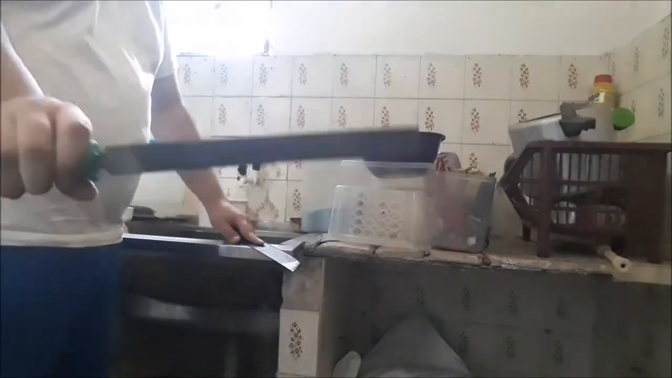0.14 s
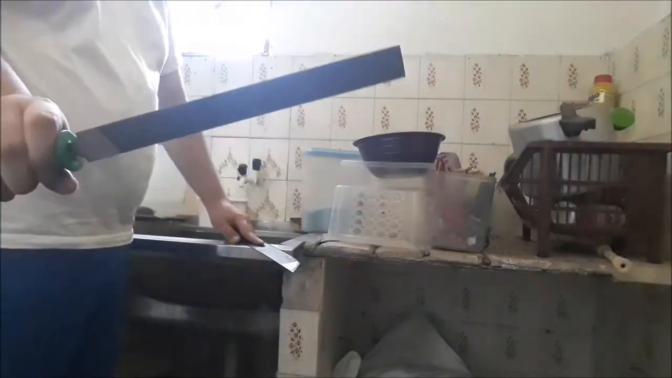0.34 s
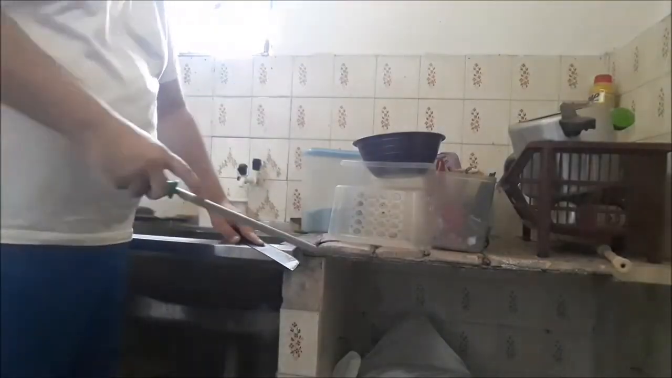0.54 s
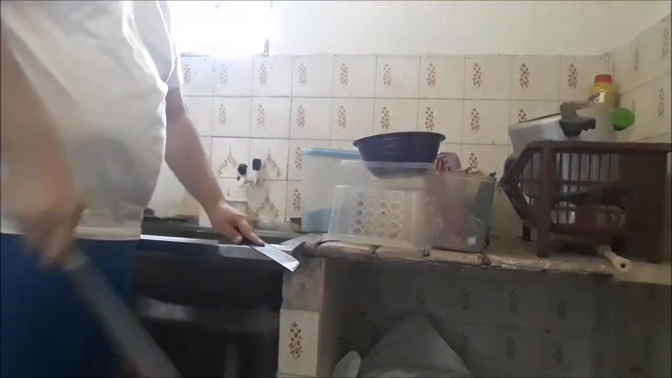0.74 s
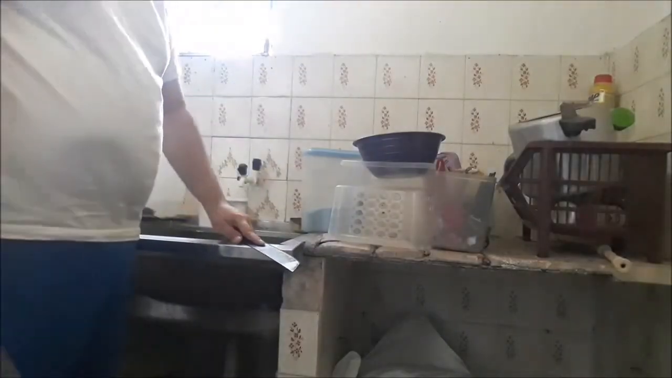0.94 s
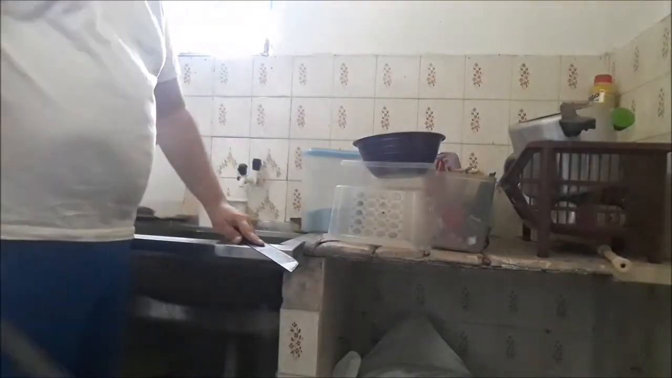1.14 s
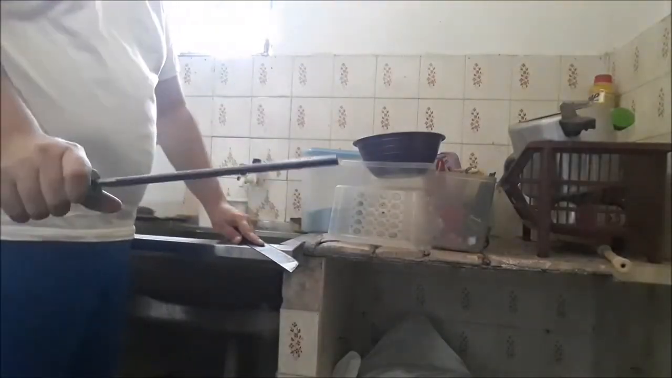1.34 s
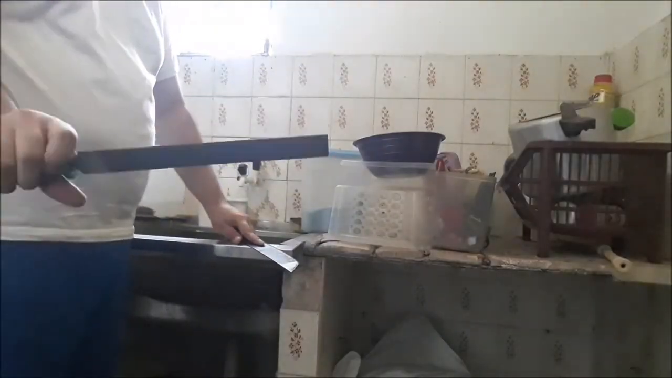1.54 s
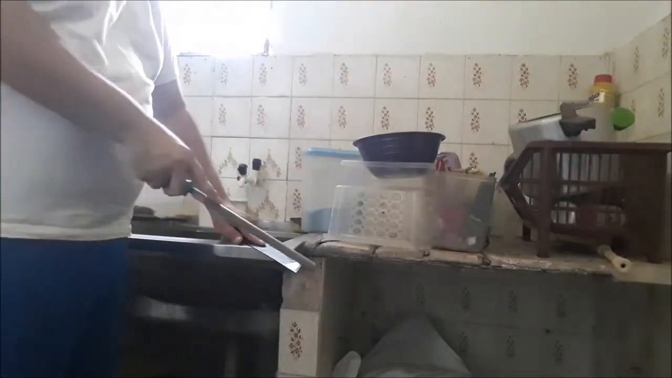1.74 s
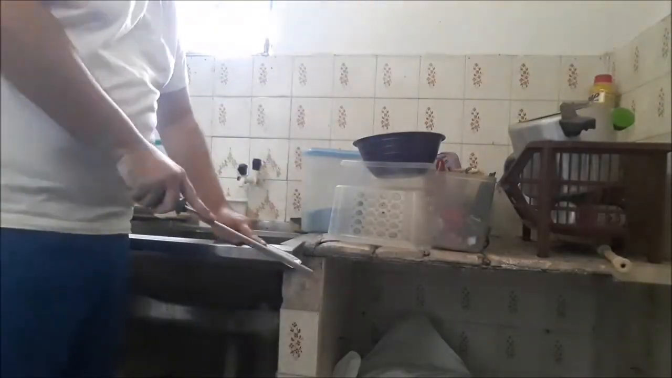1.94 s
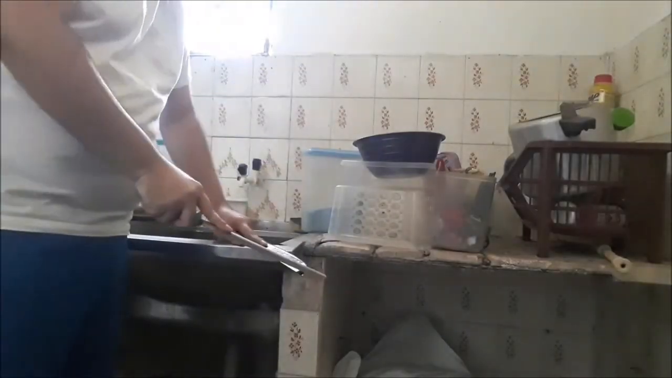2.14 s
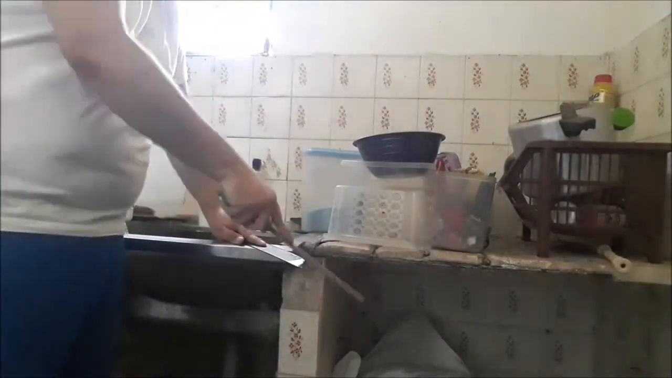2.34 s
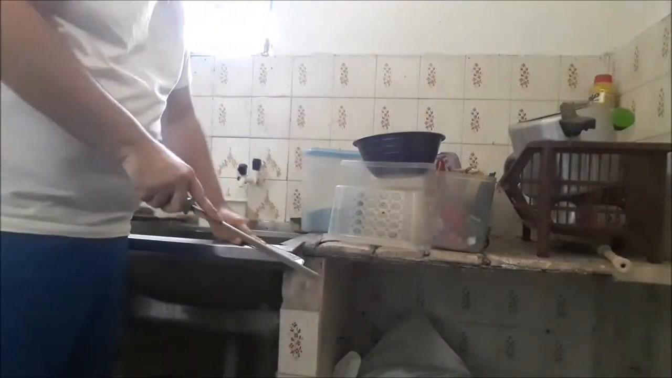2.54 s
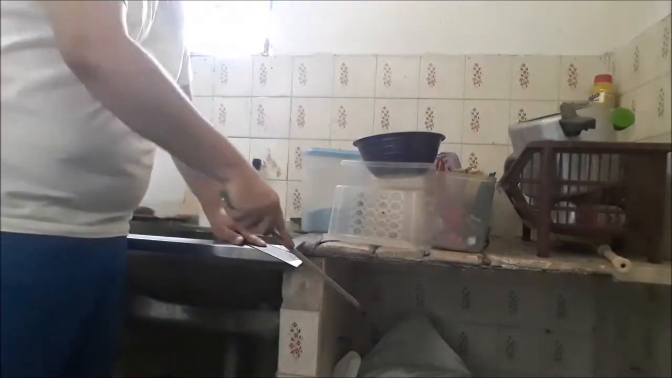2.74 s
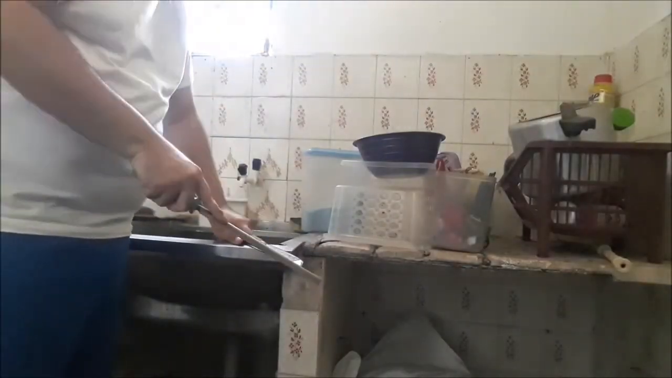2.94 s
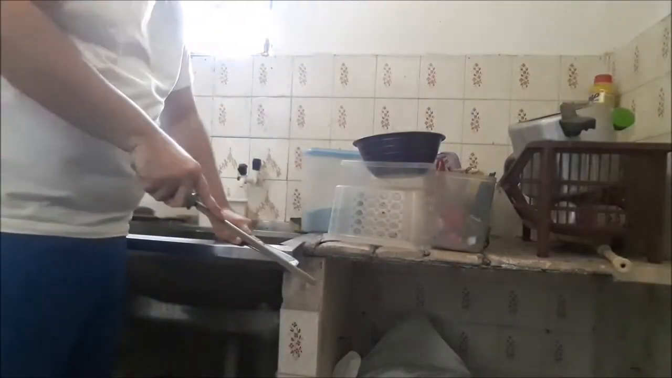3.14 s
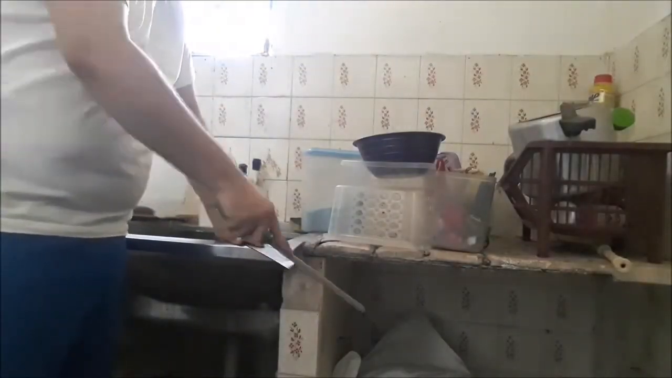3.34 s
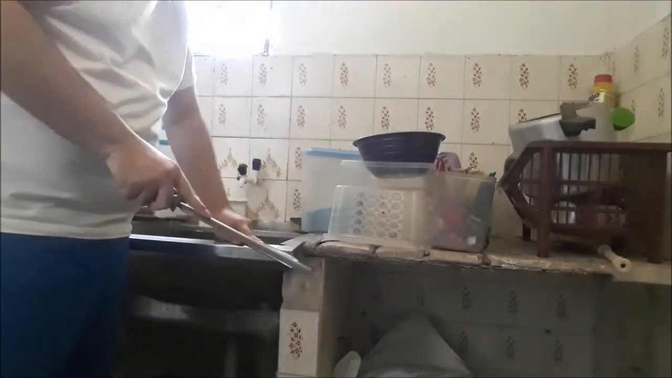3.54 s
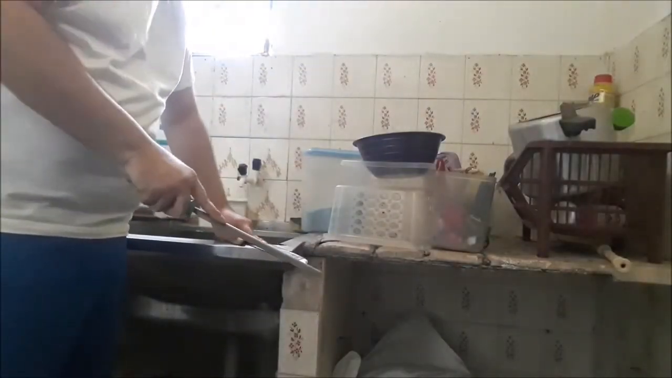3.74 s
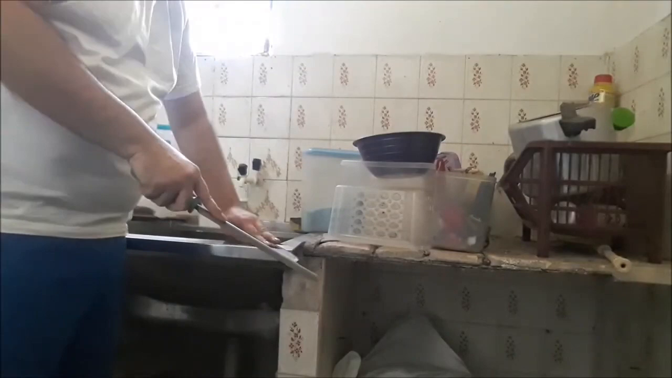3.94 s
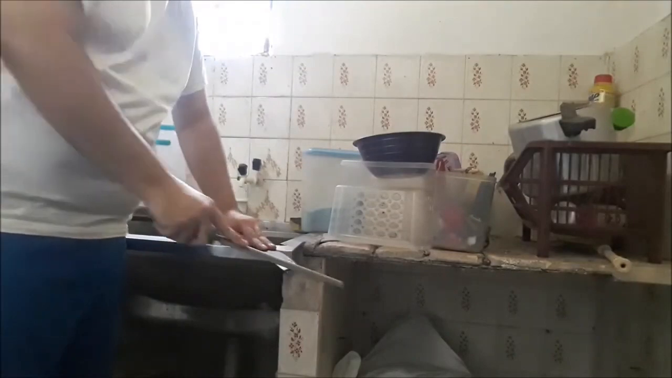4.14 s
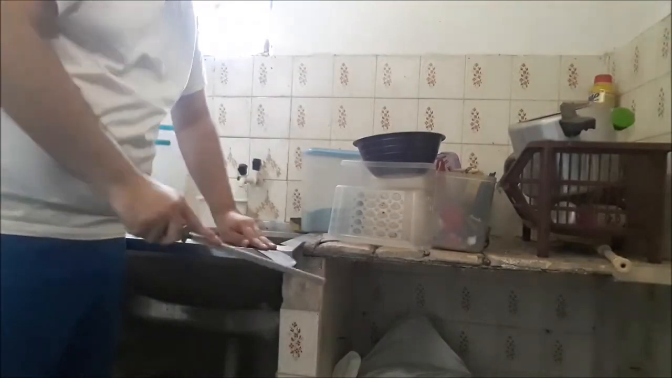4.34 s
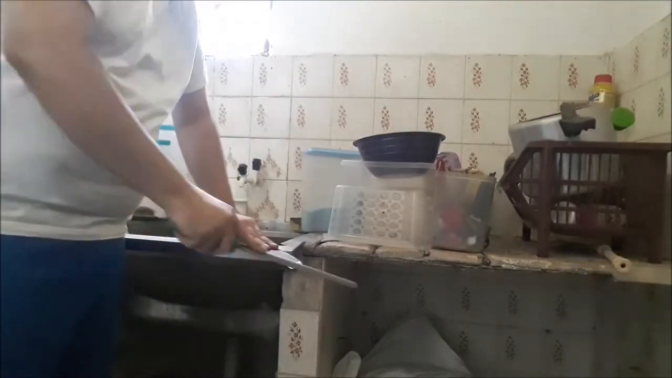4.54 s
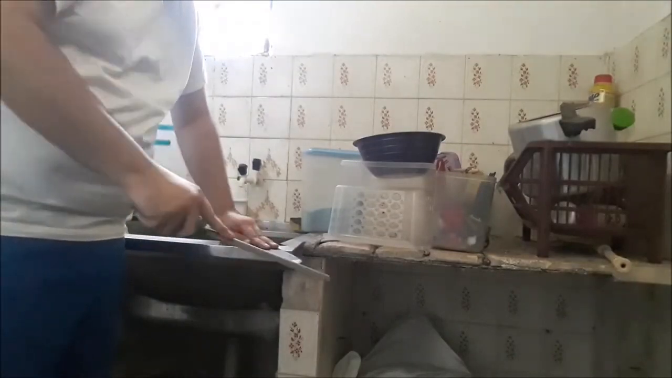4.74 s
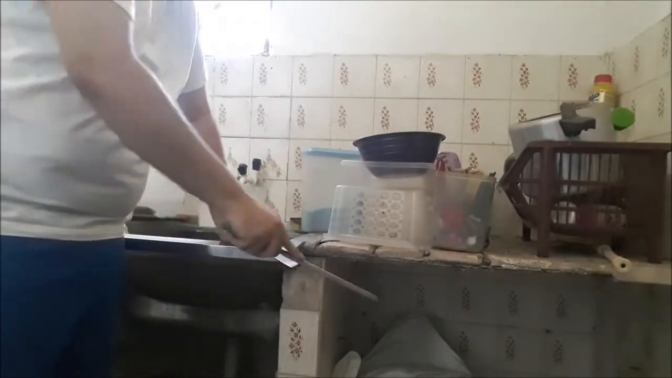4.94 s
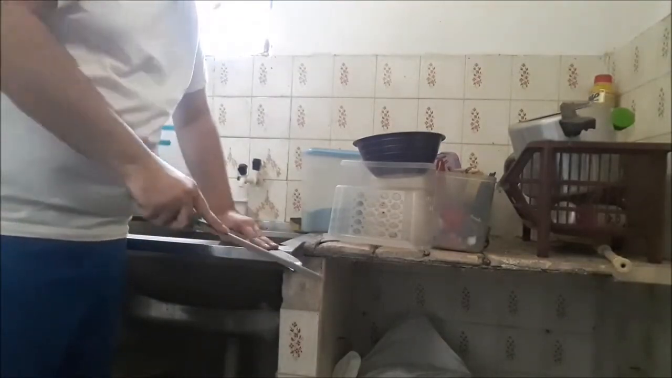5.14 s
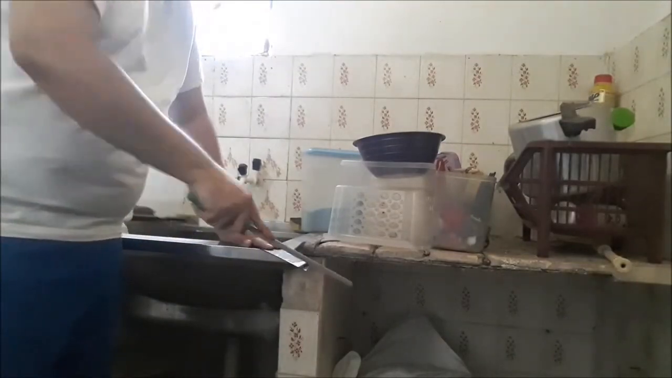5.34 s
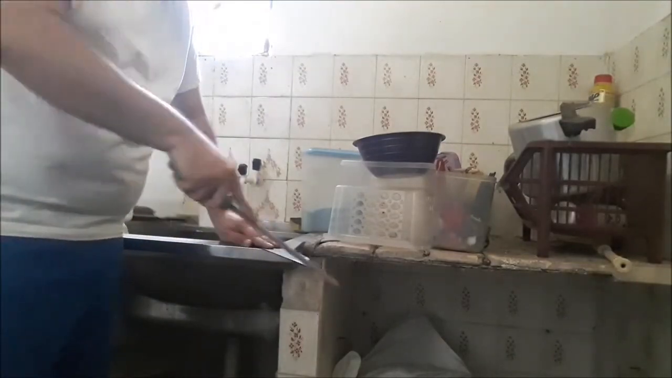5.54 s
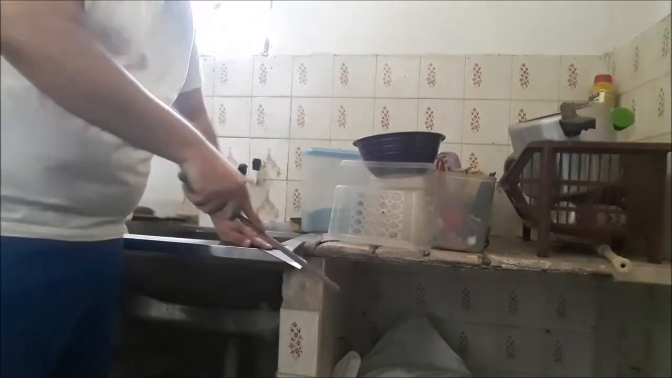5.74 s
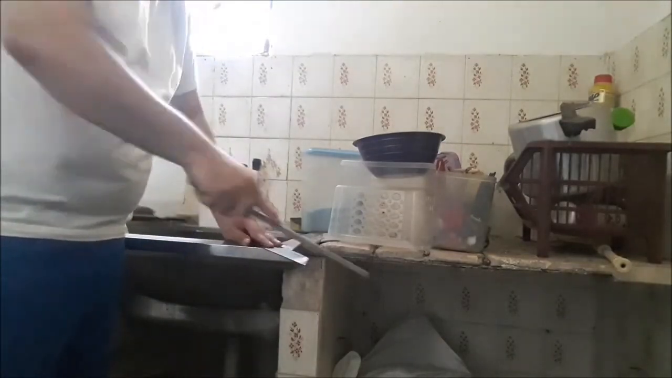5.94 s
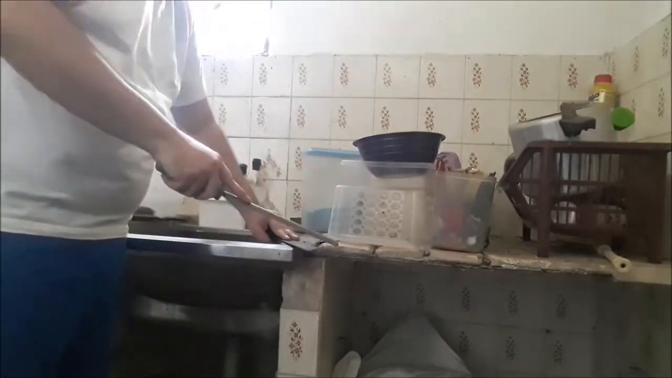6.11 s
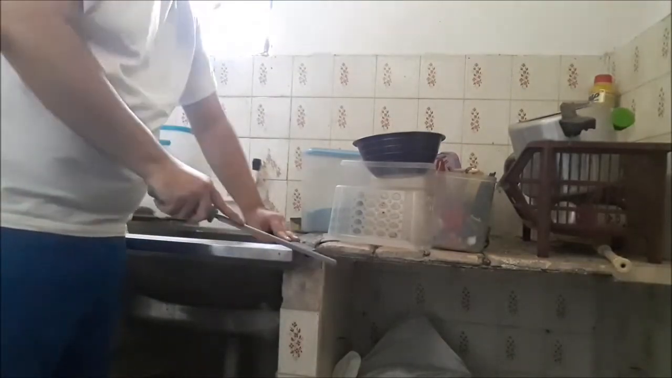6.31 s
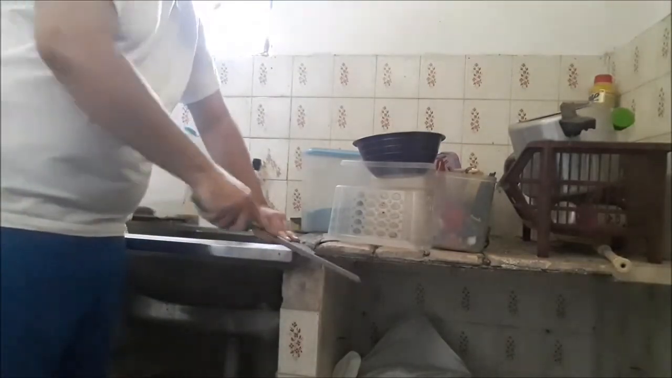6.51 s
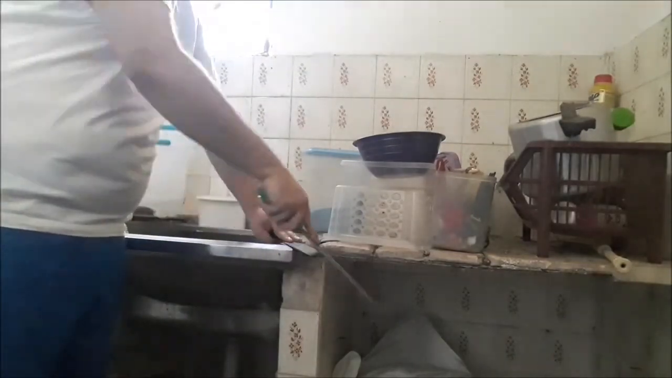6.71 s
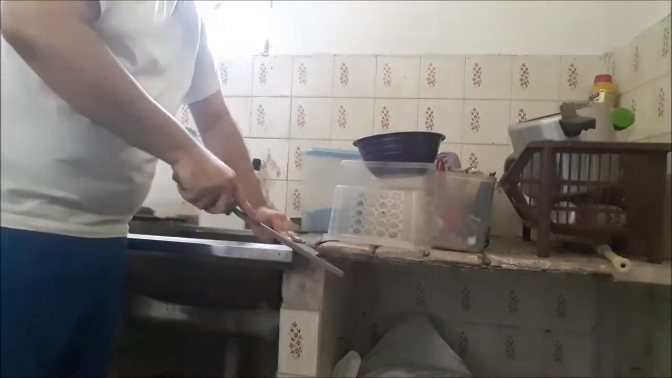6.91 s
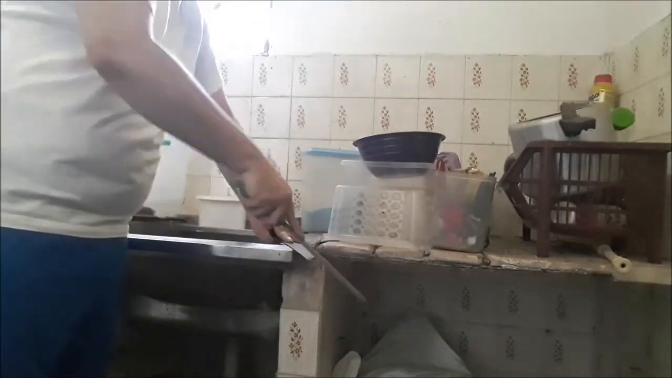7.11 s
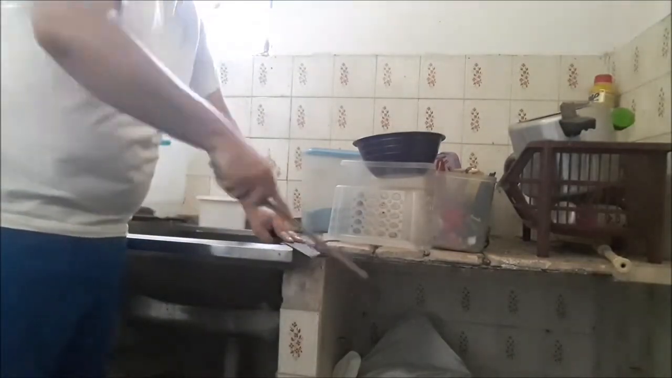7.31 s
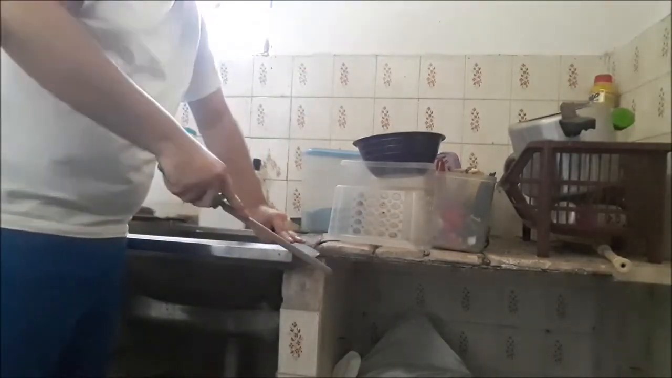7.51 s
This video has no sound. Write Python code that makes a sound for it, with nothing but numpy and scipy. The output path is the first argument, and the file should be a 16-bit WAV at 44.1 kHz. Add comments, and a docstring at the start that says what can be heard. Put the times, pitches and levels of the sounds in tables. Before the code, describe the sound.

Close view of a quiet tiled kitchen. A faint scrape and tap come first, then nearly two seconds of soft air noise with a light cloth swish. A coarse file then rasps on a steel blade in short, bright, gritty strokes, several per second, with taps between, brief squeals and low judders. The blade rings slightly and the hard walls answer briefly. A short lull comes around six seconds before the filing resumes.

```python
"""In a tiled kitchen, a coarse file rasps across the tip of a steel blade held on a counter. The file's teeth
catch in dense, uneven bursts: each catch is a click with a puff of noise, coloured by the steel. Decaying
bursts make the taps; gliding tones make the judder, and held, jittering notes the squeals. The blade rings on a
little and the walls answer briefly. Behind it are soft air noise, a low drone, a thin whine, a few cloth
swishes and dull thumps from the counter."""
import sys
import numpy as np
from scipy import signal
from scipy.fft import rfft, irfft, next_fast_len
from scipy.io import wavfile
from scipy.ndimage import uniform_filter1d, map_coordinates

SR = 44100
rng = np.random.default_rng(int(sys.argv[2]) if len(sys.argv) > 2 else 0)


def output_pcm(signal):
    """Save a mono or channel-first signal as 16-bit PCM at the path in sys.argv[1].

    Samples are clipped to [-1, 1] before scaling.
    """
    pcm = np.clip(np.atleast_2d(signal).T, -1, 1) * 32767
    wavfile.write(sys.argv[1], SR, np.round(pcm).astype(np.int16))


N = 338247

# Every level below is a starting point: the function that uses the table may trim or vary it.

# The quiet kitchen's air noise, its colour: f/Hz, level/dB per Hz (only the shape counts)
AIR_COLOUR = [(18, -71.5), (30, -32), (81, -14.5), (202, -6), (420, -9), (546, -0.5), (622, -14),
              (673, -5.5), (1360, -7), (1820, -11), (2360, -11), (3070, -11), (3320, -16), (15500, -36)]
AIR_DB = -70  # air noise before its trim and its slow changes
# The air noise eases over time: t/s, level/dB
AIR_EASING = [(0, 7.5), (.6, 1.5), (1.4, 0.5), (4, -2), (7.67, -2.5)]
# A low drone in the room: f/Hz, width/Hz, level/dB
DRONE_BAND = [(217, 60, 0)]
# A thin tone in the room, fading over time: t/s, level/dB
WHINE_LEVEL = [(0, -71), (1.2, -74.5), (2, -82.5), (7.67, -85.5)]
# How long the tiled walls answer: f/Hz, time to fall by 60 dB/s
WALL_FADE = [(200, 0.13), (1200, 0.24), (2300, 0.26), (3400, 0.17), (4800, 0.12), (8000, 0.098),
             (15000, 0.094)]
# The counter takes the push of the file: t/s, level/dB
THUMPS = [(.165, -75), (2.735, -69), (4.23, -71), (5.55, -78), (5.849, -70), (6.53, -65), (7.29, -70)]
# Colour of those thumps: f/Hz, level/dB per Hz (only the shape counts)
THUMP_COLOUR = [(15, -21), (50, -13), (100, -4.5), (250, -10.5), (500, -28.0), (1500, -88.5)]
# The shirt swishes as the arm comes forward: t/s, length/s, centre f/Hz, level/dB
SLEEVE_SWISHES = [(1.574, .062, 4030, -74.5), (1.65, 0.063, 2610, -65.5), (1.73, .052, 2720, -70.5),
                  (1.813, 0.047, 2880, -73), (1.806, .05, 4300, -72), (1.82, .05, 5670, -74)]
# Colour of the broad hiss under each swish: f/Hz, level/dB per Hz (only the shape counts)
CLOTH_COLOUR = [(1200, -40), (2300, 5), (3500, -2), (8000, -7.5), (10500, -19), (14000, -4), (15500, -13)]

# Colour of the rasping before the steel's resonances: f/Hz, level/dB per Hz (only the shape counts)
RASP_COLOUR = [(190, -58.5), (330, -26), (400, -38), (470, -0.5), (580, -25.5), (670, -1.5), (1070, -9),
               (1180, -6.5), (1480, -1.5), (1940, -4.5), (2400, -6.5), (2800, -2), (4410, 0), (5270, -6),
               (6290, -5), (9110, -10), (15500, -10.5)]
# Low resonances, where blade and file bend: f/Hz, width/Hz, level/dB
BENDING_MODES = [(482, 39, 1.5), (675, 65, 3.5), (1190, 34, -4), (1504, 230, -4)]
# High resonances, near the edge: f/Hz, width/Hz, level/dB
EDGE_MODES = [(3320, 970, -4), (4060, 62, -8), (4460, 44, -4), (4950, 400, -10.5), (5740, 25, -3.5),
              (5950, 190, -4.5), (6300, 79, 0), (7025, 81, 2), (7560, 190, 0), (9980, 290, 0),
              (10300, 94, -31.5), (12300, 45, -23.5), (12400, 44, -4)]
# The blade rings on: f/Hz, level/dB, time to fall by 60 dB/s
RING_MODES = [(460.4, -3, 0.4), (662.7, -3, 0.22), (948, -4.5, 0.4), (1012, -2.5, 0.53), (1215, 0, 0.54),
              (1410, -4.5, 0.26), (1513, -4, 0.2), (1690, -8.5, 0.41), (1965, -6, 0.33), (2110, -9, 0.35),
              (2530, -10.5, .2), (2700, -9.5, .2), (3450, -4.5, .17)]
# The teeth catch in step and the blade sings: t/s, length/s, first f/Hz, last f/Hz, level/dB
JUDDERS = [(2.217, 0.052, 480, 445, -46.5), (2.425, 0.054, 1010, 670, -42), (2.726, 0.024, 500, 450, -44),
           (2.844, 0.035, 857, 636.5, -47), (3.316, 0.047, 517, 456.2, -38.5),
           (3.469, 0.025, 491, 470, -44), (3.034, .04, 700, 660, -54), (4.696, 0.061, 815, 682, -44),
           (5.035, 0.0576, 722, 650, -46), (5.41, 0.064, 484, 480, -43.5), (5.851, .034, 484.6, 454.5, -38),
           (5.95, 0.057, 480.7, 470.7, -34), (7.09, .054, 683.7, 724.3, -41.5)]
# The edge locks onto one note: t/s, length/s, name of the note, level/dB
SQUEALS = [(2.195, 0.058, "edge", -43.5), (2.74, .045, "edge", -35), (2.754, .026, "low", -36),
           (2.78, .04, "keen", -32.5), (3.338, .03, "edge", -36), (3.355, 0.046, "keen", -35),
           (3.4, 0.038, "edge", -34), (4.267, 0.058, "keen", -39.5), (4.277, 0.092, "hollow", -40.5),
           (4.96, 0.054, "shrill", -42), (5.28, .02, "low", -44.5), (5.311, 0.021, "low", -43),
           (5.366, .05, "low", -38.5), (5.42, 0.03, "body", -32.5), (5.851, 0.023, "low", -43),
           (5.89, 0.048, "shrill", -34), (5.986, 0.039, "edge", -44), (6.609, .032, "reedy", -39),
           (6.67, 0.05, "keen", -38), (6.738, 0.069, "body", -34.5), (6.742, 0.073, "keen", -33),
           (6.819, 0.02, "hollow", -38), (7.197, .074, "keen", -35.5), (7.206, 0.034, "thin", -33.5),
           (7.298, 0.067, "keen", -32)]
# The notes that can squeal, before they waver: name to f/Hz
SQUEAL_HZ = {"low": 1233, "body": 1498, "reedy": 2780, "hollow": 3110, "edge": 3465, "thin": 4130, "keen":
             4400, "shrill": 6130}
# The file taps the blade: t/s, level/dB
TAPS = [(0.0014, -38.5), (1.075, -54), (1.964, -36.5), (2.5765, -36), (2.6615, -39), (2.9673, -35),
        (3.1287, -48.5), (3.2526, -30), (3.7271, -35.5), (4.0587, -42), (4.112, -29.5), (4.4777, -30),
        (4.5436, -27.5), (4.6027, -26), (4.8805, -30.5), (5.2778, -26.5), (5.3106, -32.5), (5.532, -26),
        (6.1968, -51.5), (6.2663, -51.5), (6.3917, -33.5), (7.016, -41.5), (7.5162, -40.5), (7.6559, -37.5)]
# A tap flexes the blade: f/Hz, width/Hz, level/dB
TAP_FLEX = [(657, 70, 0.5)]
# Each time the teeth take hold: t/s, length/s, time to full pressure/s, hiss level at full pressure/dB,
# how much lighter at the start/dB, how much lighter at the end/dB,
# bite (middle) level against hiss/dB, body (low) level against hiss/dB
STROKES = [ (0.039, 0.064, .028, -70.5, -7, 0, -3, -6), (0.11, 0.053, .014, -53, -6, 21, -4, 1),
           (0.168, .018, 0.0045, -44, 0, 8, -10.5, -25), (2.009, 0.085, .068, -63, 27.5, -0.5, 2.5, 5.5),
           (2.195, 0.055, .035, -40, 2, 13, -3.5, -3.5), (2.365, 0.11, .004, -26, 2.5, 16.5, -7, -14),
           (2.712, .013, .006, -36.5, 3, 15, -1.5, -10), (2.729, .155, .05, -27.5, 3.5, 22, -5.5, -12),
           (3.018, .037, .02, -53, 3.5, 7, -1, -4), (3.219, .03, .025, -63, 8, 6, -2, -5),
           (3.291, 0.033, .008, -33, 2, 5.5, -6.5, -14.5), (3.332, 0.15, .055, -29, 3, 7, -5, -12.5),
           (3.574, .049, .006, -47.5, -3, 14, 0.5, -4.5), (3.643, .026, .014, -54.5, 0, 11, 1, -5),
           (3.787, .09, 0.026, -72.5, 3.5, 14, -2, 5), (3.968, .04, 0.021, -28, 17.5, 9, -8, -14),
           (4.211, 0.044, .024, -26, 8, 11, -6, -11), (4.256, 0.11, .06, -31, 2.5, 7.5, -4, -11.5),
           (4.598, 0.033, .004, -35, 3, 11, -24, -7.5), (4.635, 0.092, .05, -27, 18.5, 12, -5, -11),
           (4.727, 0.054, .035, -35.5, 4.5, 11, -4, -5), (4.921, 0.11, .066, -27, 19, 15, -7, -12.5),
           (5.037, 0.063, .035, -27, 14.5, 15, -6.5, -8), (5.2, 0.077, .004, -43.5, -8, 21.5, -2.5, -5),
           (5.361, 0.13, .085, -28.5, 4.5, 8, -2, -6.5), (5.529, 0.068, .04, -31, 5, 13.5, -4.5, -7),
           (5.691, .039, .015, -53.5, -5, 0.5, 1, 0), (5.838, .018, .01, -31, 5, 6.5, -5.5, -8.5),
           (5.869, 0.15, .045, -28.5, 7, 5, -5.5, -7.5), (6.47, .08, 0.031, -59.5, 15, 9, 7, 8.5),
           (6.566, 0.081, .05, -29, 22.5, 3, -1.5, -8.5), (6.656, .068, .04, -35, 1.5, 16, 1, -4),
           (6.739, 0.071, .01, -33.5, -4, 3.5, 0.5, -3.5), (6.812, 0.048, .026, -29.5, 5.5, 18, 0, -6),
           (7.064, 0.16, .075, -33, 7, 7.5, -1.5, -8), (7.237, 0.037, .014, -34.5, 1, 17, 1, -2),
           (7.29, 0.092, .025, -28, 4.5, 17, -2, -5), (7.569, 0.098, .046, -53, 7.5, 24, 7.5, 5.5), ]
# Strokes: extra level of the treble above 10 kHz: t/s, level/dB
TREBLE_LEVEL = [(2.8, 1), (3.4, 3.5), (4, -2.5), (5, -2), (5.45, 1), (5.95, -4), (6.65, 1.5), (7.3, 2)]
# Strokes: extra level of the blade's lowest sounds, under 1.1 kHz: t/s, level/dB
DEPTH_LEVEL = [(2.2, 2.5), (2.4, -4), (3, 3.5), (3.5, 2), (4.2, -2), (4.7, -2.5), (5.4, 0), (6, -0.5),
               (6.7, -2.5), (7.3, -1)]

SWELL_SHAPE, EASE_SHAPE = 1.06, 1.52  # powers of time by which the pressure builds and lets go
BITE_FOLLOWS, BODY_FOLLOWS = 0.73, 0.51  # dB for each dB of hiss: a light touch sounds duller
TAP_T60_S = 0.08  # a tap falls by 60 dB in this time
FIRM_TAP_DB = -35.5  # table level of an ordinary tap, which gets no extra body
TOP_HZ = 15680  # nothing is heard far above this


def amp(db):
    """Turn decibels into a gain."""
    return 10 ** (np.asarray(db) / 20)


def unit(x):
    """Scale to an average (rms) level of 1."""
    return x / np.sqrt(np.mean(x ** 2) + 1e-20)


def steady(x):
    """Hold the rms near 1 in every 25 ms, keeping the finer grain."""
    return x / np.sqrt(np.abs(uniform_filter1d(x ** 2, SR // 40)) + 1e-12)


def clock():
    """The time of every sample, in seconds."""
    return np.arange(N) / SR


def over_time(points):
    """Join (time, value) points with straight lines."""
    return np.interp(clock(), *np.transpose(points))


def along(points, hz):
    """Join (Hz, value) points with straight lines on a log frequency axis."""
    f, v = np.transpose(points)
    return np.interp(np.log(hz + 1), np.log(f + 1), v)


def wobble(rate):
    """A smooth random curve with this many random points a second."""
    points = rng.standard_normal(int(N * rate / SR) + 4)
    return map_coordinates(points, [np.arange(N) * rate / SR])


def filtered(x, response):
    """Multiply the spectrum of x by a response, which may also shift phase."""
    size = next_fast_len(N + SR // 2)
    hz = np.fft.rfftfreq(size, 1 / SR)
    return irfft(rfft(x, size) * response(hz), size)[:N]


def under(hz, edge_hz):
    """A steep gain that lets through what lies under the edge."""
    return 1 / (1 + (hz / edge_hz) ** 16)


def noise(colour):
    """Random noise of rms 1 with the given colour."""
    return unit(filtered(rng.standard_normal(N), lambda hz: amp(along(colour, hz))))


def resonance(modes, hz):
    """Add up resonances; each is strongest at its own frequency."""
    return sum(amp(db) * 1j * hz * width / (centre * centre - hz * hz + 1j * hz * width)
               for centre, width, db in modes)


def patchy(x, depth_db, size=6):
    """Make short-lived clumps of frequencies louder and softer."""
    z = signal.stft(x, nperseg=1024)[2]
    field = uniform_filter1d(rng.standard_normal(z.shape), size, axis=0)
    field = uniform_filter1d(field, size, axis=1)
    return signal.istft(z * amp(depth_db * unit(field)), nperseg=1024)[1][:N]


def background(whine_hz, air_db, hum_db):
    """Room air as coloured noise, a drone as narrow noise, and a whine as a wavering sine."""
    air_level = AIR_DB + air_db + over_time(AIR_EASING) + 0.33 * wobble(5.3)
    air = amp(air_level) * patchy(noise(AIR_COLOUR), depth_db=1.6)
    drone = unit(filtered(rng.standard_normal(N), lambda hz: resonance(DRONE_BAND, hz) ** 2))
    phase = 2 * np.pi * np.cumsum(whine_hz + 24 * wobble(60)) / SR
    whine = amp(over_time(WHINE_LEVEL) + 1.1 * wobble(10.0)) * np.sin(phase)
    return air + amp(hum_db) * drone + whine


def kitchen(x, count=12):
    """The tiled walls answer with fading noise, differently as the arm moves the sound's paths."""
    t, out = clock(), np.zeros(N)
    step = t[-1] / (count - 1)
    for k in range(count):
        hz, age, z = signal.stft(rng.standard_normal(SR // 2), SR, nperseg=256)
        fade = amp(-60 * age / along(WALL_FADE, hz)[:, None])
        tail = signal.istft(z * fade, SR, nperseg=256)[1]
        tail = np.pad(tail, (SR // 300, 0))  # the answer comes about 3 ms late
        share = np.maximum(1 - np.abs(t / step - k), 0)  # blend from one answer to the next
        out += signal.oaconvolve(x * share, tail / np.linalg.norm(tail))[:N]
    return out


def counter(t60):
    """Where the file bears down, low noise swells quickly and dies away as a dull thump."""
    t, push = clock(), np.zeros(N)
    for s, db in THUMPS:
        fall_s = np.where(t > s, t60, .04)  # 60 dB times, after and before the peak
        push += amp(db - 60 * np.abs(t - s) / fall_s)
    return push * noise(THUMP_COLOUR)


def sleeve(width_hz, hiss_db):
    """Each fold of cloth swishes as noise in its own band, over a fainter broad hiss."""
    t, out = clock(), np.zeros(N)
    hiss = amp(hiss_db) * noise(CLOTH_COLOUR)
    for s, length, centre_hz, db in SLEEVE_SWISHES:
        band = lambda hz: np.exp(-((hz - centre_hz) / width_hz) ** 2)
        swish = unit(filtered(rng.standard_normal(N), band))
        swell = np.exp(-(2 * (t - s) / length) ** 2)
        out += amp(db) * swell * (swish + hiss)
    return out


def after_ring(x):
    """The blade's notes fade slowly, so they sound on after the file leaves."""
    t = np.arange(SR // 2) / SR
    ring = sum(amp(db - 60 * t / t60) * np.sin(2 * np.pi * hz * t) for hz, db, t60 in RING_MODES)
    return signal.fftconvolve(x, ring / np.linalg.norm(ring))[:N]


def judder(waver, overtone_db):
    """At low speed the tooth rate meets a bending note of the blade: a short gliding tone."""
    t, out = clock(), np.zeros(N)
    drift = 1 + waver * wobble(150)
    for s, length, first_hz, last_hz, db in JUDDERS:
        on = (t > s) & (t < s + length)
        u = (t[on] - s) / length  # 0 at the start, 1 at the end
        glide_hz = (first_hz + (last_hz - first_hz) * u) * drift[on]
        phase = 2 * np.pi * np.cumsum(glide_hz) / SR
        tone = np.sin(phase) + amp(overtone_db) * np.sin(2 * phase)
        out[on] += amp(db) * np.sin(np.pi * u) * tone
    return out


def squeals(waver, flutter_db, squeal_db):
    """Sticking and slipping keeps one note going while its pitch (waver in Hz) and size jitter."""
    t, out = clock(), np.zeros(N)
    jolts_hz = waver * wobble(500)
    size = amp(squeal_db + flutter_db * wobble(250))
    for s, length, mode, db in SQUEALS:
        on = (t > s) & (t < s + length)
        swell = np.sqrt(np.abs(np.sin(np.pi * (t[on] - s) / length)))
        phase = 2 * np.pi * np.cumsum(SQUEAL_HZ[mode] + jolts_hz[on]) / SR
        out[on] += amp(db) * swell * size[on] * np.sin(phase)
    return out


def teeth(slow_hz, fast_hz, scatter, size_db, grit):
    """Each tooth catches with a click and a puff of breaking swarf, more often in mid-stroke."""
    t, speed = clock(), np.zeros(N)
    for start, length, *_ in STROKES:
        speed += np.sin(np.pi * np.clip((t - start) / length, 0, 1))
    rate = (slow_hz + fast_hz * speed) * np.exp(scatter * wobble(700))
    # a click each time the running count of teeth passes a whole number
    clicks = np.diff(np.floor(np.cumsum(rate) / SR), prepend=0)
    catches = clicks * amp(size_db * rng.standard_normal(N))
    puff_fade = np.exp(-1 / (0.00071 * SR))  # fades over 0.71 ms
    puffs = signal.lfilter([1], [1, -puff_fade], catches) * rng.standard_normal(N)
    # dividing stops denser clicks from simply being louder
    return unit((unit(catches) + grit * unit(puffs)) / np.sqrt(rate))


def steel(drive, bending_db, edge_db):
    """The steel colours the catches; its answer is split into steady hiss, bite and body."""
    def colour(hz):
        bending = amp(bending_db) * resonance(BENDING_MODES, hz)
        edge = amp(edge_db) * resonance(EDGE_MODES, hz)
        return amp(along(RASP_COLOUR, hz)) * (1 + bending + edge)

    # high bending waves travel faster, which smears each catch over about a millisecond
    spread = lambda hz: np.exp(-2j * np.pi * np.sqrt(hz) / 7)
    # the moving contact point favours ever different notes
    shifting = patchy(drive, depth_db=2.5)
    sound = filtered(shifting, lambda hz: colour(hz) * spread(hz))
    hiss = filtered(sound, lambda hz: 1 - under(hz, 5200))
    bite = filtered(sound, lambda hz: under(hz, 5200) - under(hz, 2400))
    body = filtered(sound, lambda hz: under(hz, 2400) - under(hz, 370))
    return steady(hiss), steady(bite), steady(body)


def taps(attack, tap_db, bite_db, body_db, dulling):
    """The file lands and skips over the teeth; a softer landing has a larger share of body."""
    drive = teeth(slow_hz=880, fast_hz=301.4, scatter=.4, size_db=0.5, grit=6.3)
    hiss, bite, body = steel(drive, bending_db=0.5, edge_db=-2.5)
    body = steady(filtered(body, lambda hz: 1 + resonance(TAP_FLEX, hz)))
    out = np.zeros(N)
    for s, db in TAPS:
        on = slice(int(s * SR), int(s * SR) + SR // 4)
        t = np.arange(len(out[on])) / SR
        blow = amp(db + tap_db - 60 * t / TAP_T60_S) * (1 - np.exp(-t / attack))
        body_gain = amp(body_db + dulling * (FIRM_TAP_DB - db))
        out[on] += blow * (hiss[on] + amp(bite_db) * bite[on] + body_gain * body[on])
    return out


def pressure(age, length, crest, entry_db, exit_db):
    """The hand bears down until the crest and then eases off; dB against full pressure."""
    building = np.clip(1 - age / max(crest, 1e-3), 0, 1)
    easing = np.clip((age - crest) / max(length - crest, 1e-3), 0, 1)
    return -entry_db * building ** SWELL_SHAPE - exit_db * easing ** EASE_SHAPE


def strokes(attack, release, chatter_db, hiss_db, bite_db, body_db):
    """Pressure sets level and brightness; the place of contact shifts weight from edge to body."""
    drive = teeth(slow_hz=449.9, fast_hz=905.0, scatter=.25, size_db=-0.5, grit=2.3)
    hiss, bite, body = steel(drive, bending_db=-2.0, edge_db=-1.0)
    t, out = clock(), np.zeros(N)
    treble = filtered(hiss, lambda hz: 1 - under(hz, 10000))
    hiss = hiss + (amp(over_time(TREBLE_LEVEL)) - 1) * treble
    low = filtered(body, lambda hz: under(hz, 1100))
    body = body + (amp(over_time(DEPTH_LEVEL)) - 1) * low
    for start, length, crest, db, entry_db, exit_db, edge_db, blade_db in STROKES:
        on = slice(int(start * SR), int((start + length + .05) * SR))  # leaves 50 ms to die away
        age = t[on] - start
        press_db = pressure(age, length, crest, entry_db, exit_db)
        touch = np.clip(age / attack, 0, 1) * np.exp(-np.maximum(age - length, 0) / release)
        stroke = amp(hiss_db + press_db) * hiss[on]
        stroke += amp(bite_db + edge_db + BITE_FOLLOWS * press_db) * bite[on]
        stroke += amp(body_db + blade_db + BODY_FOLLOWS * press_db) * body[on]
        out[on] += touch * amp(db) * stroke
    return out * amp(chatter_db * wobble(110))


def scene():
    """Mix file and blade, the walls' answer and the quiet sounds; attack, release and t60 in seconds."""
    rasp = strokes(attack=0.0047, release=0.0039, chatter_db=1.16, hiss_db=-1.0, bite_db=-4, body_db=-3)
    rasp = rasp + taps(attack=0.0026, tap_db=-8.5, bite_db=-3.0, body_db=-4.0, dulling=0.31)
    rasp = rasp + judder(waver=0.022, overtone_db=-17.5)
    rasp = rasp + squeals(waver=82, flutter_db=2.5, squeal_db=1.5)
    direct = rasp + amp(-21.0) * after_ring(rasp)
    quiet = counter(t60=.15) + sleeve(width_hz=510, hiss_db=-3.5)
    quiet = quiet + background(whine_hz=1850, air_db=-1.5, hum_db=-84)
    return (direct + amp(-3.5) * kitchen(direct) + quiet)[None]


def record(dry):
    """A very steep cut removes what lies above the top frequency."""
    return filtered(dry[0], lambda hz: 1 / (1 + (hz / TOP_HZ) ** 300))[None]


dry = scene()
out = record(dry)
output_pcm(out)
```